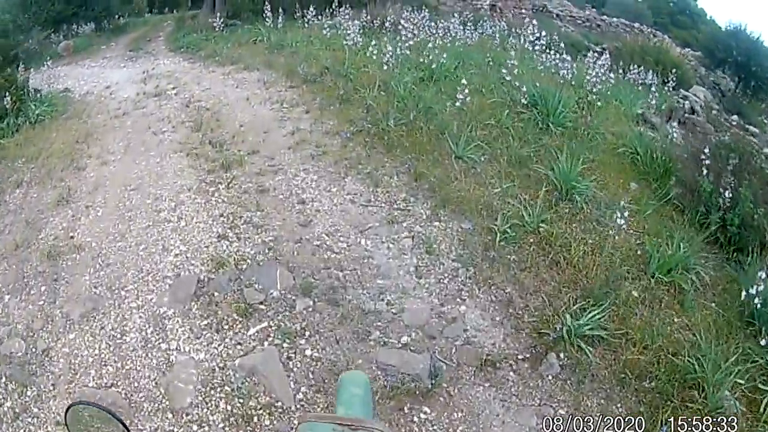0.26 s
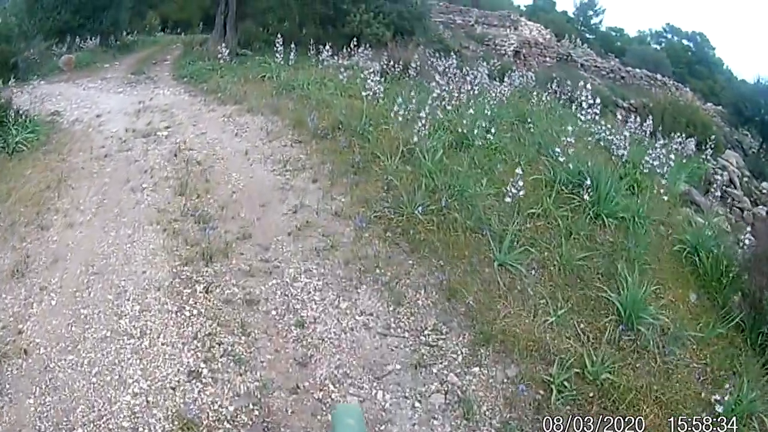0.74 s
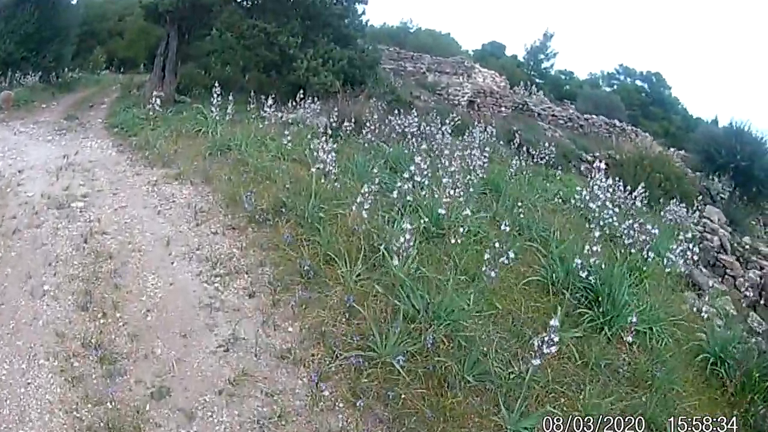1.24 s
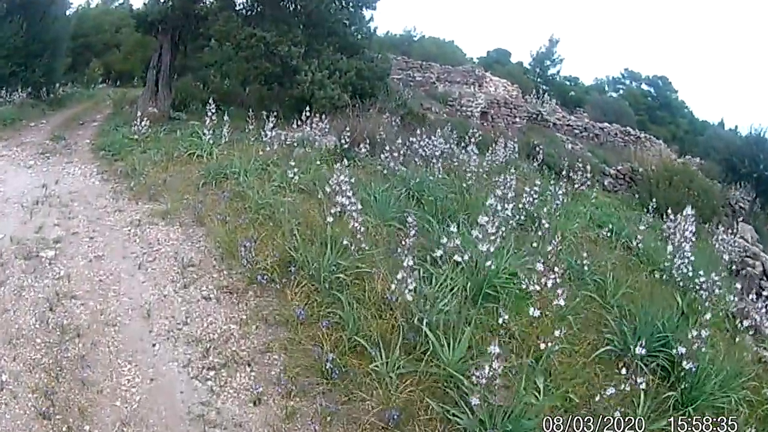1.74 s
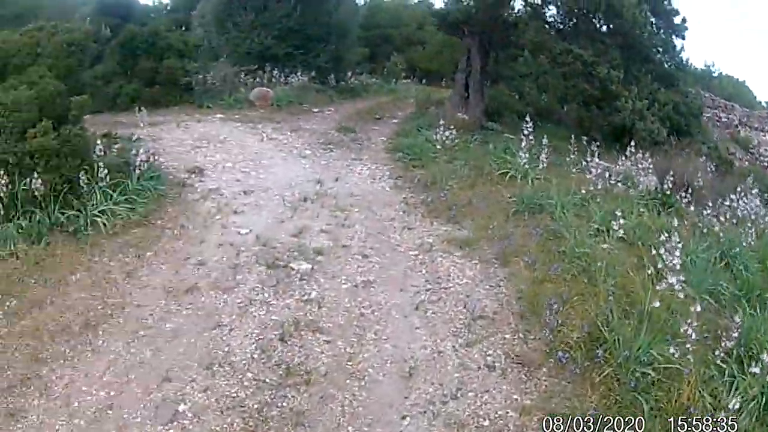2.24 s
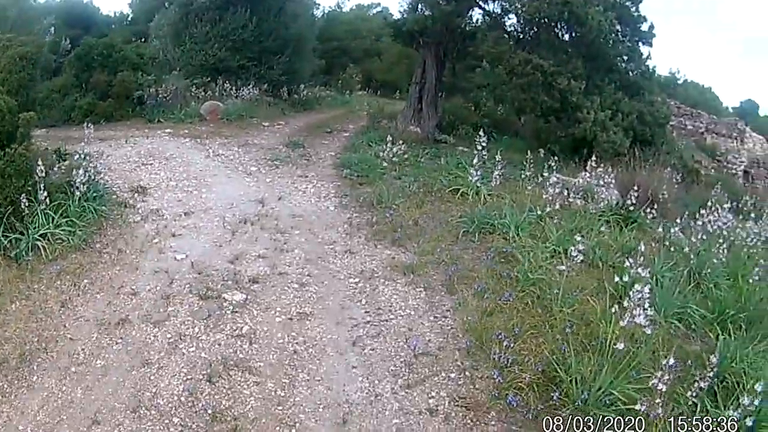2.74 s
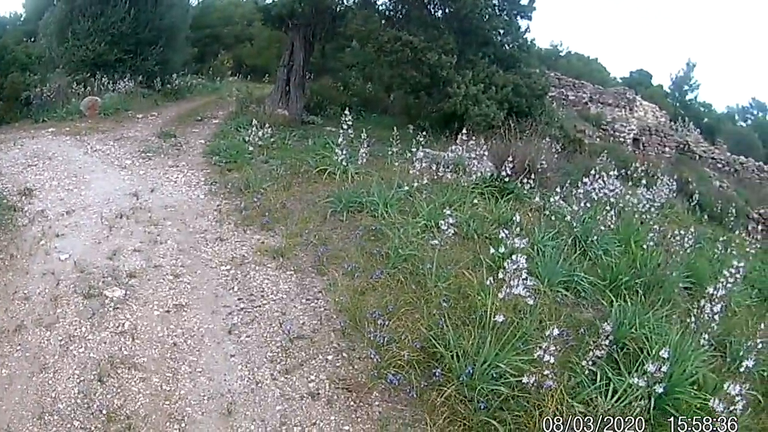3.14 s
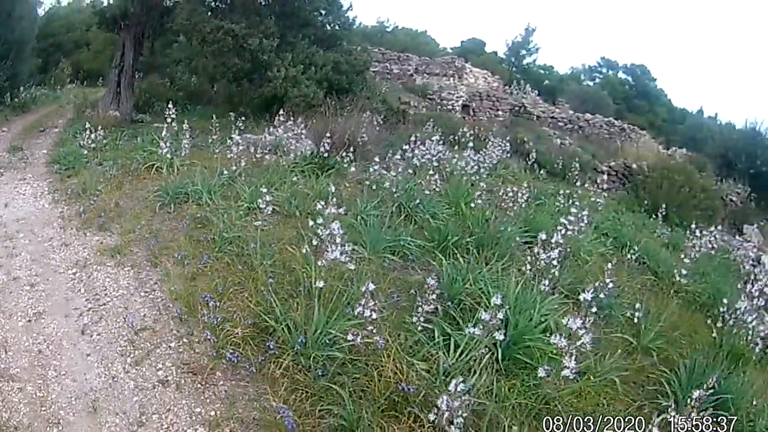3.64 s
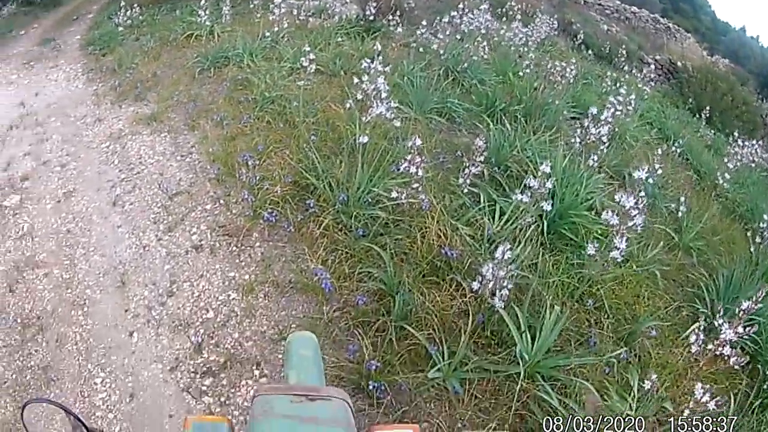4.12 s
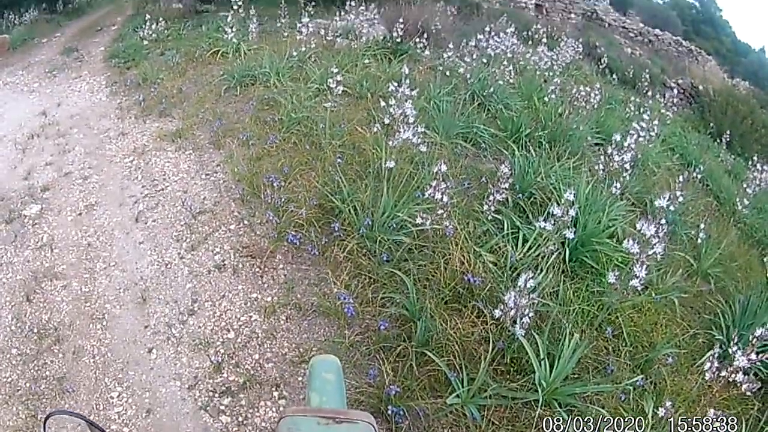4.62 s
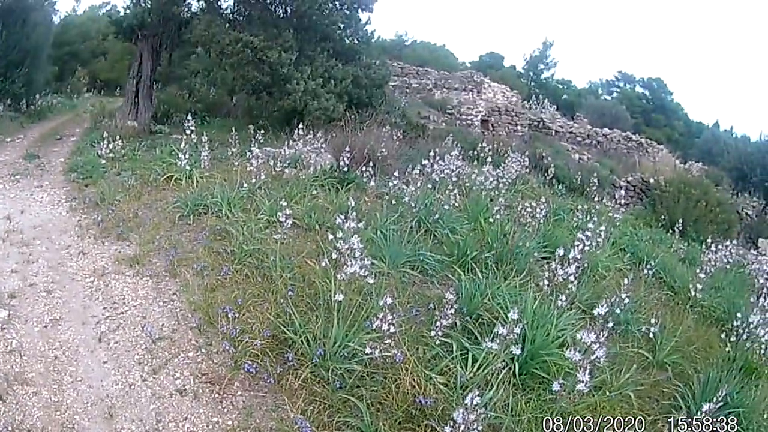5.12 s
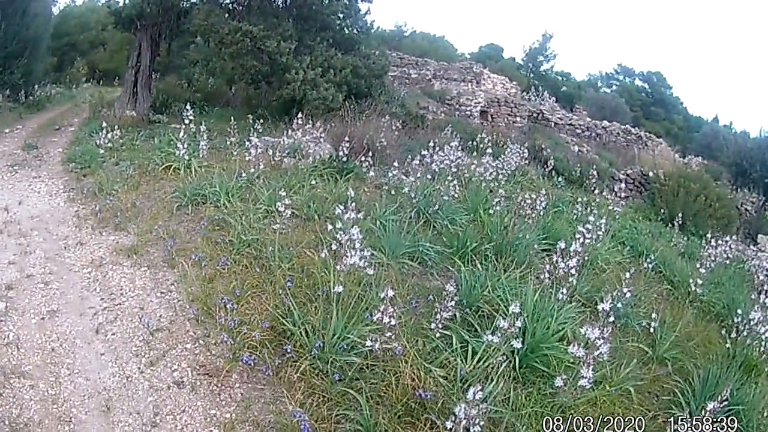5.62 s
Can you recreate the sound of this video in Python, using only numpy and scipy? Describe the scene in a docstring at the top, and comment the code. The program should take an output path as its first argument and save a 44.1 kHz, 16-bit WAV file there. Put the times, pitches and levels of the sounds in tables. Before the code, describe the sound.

A small single-cylinder motorcycle engine heard from the rider's head outdoors. It starts fast on a closed throttle, swells into a brief throaty rev, then falls away with loose metal chinking. By about two seconds it settles to a low, steady putter of separate thumps, with tappet ticks, soft knocks, a mechanical whirr and occasional weak beats.

```python
"""A small single-cylinder engine thumps through a blip of throttle and an overrun, then settles to idle, heard
at the rider's helmet. Each exhaust opening pushes or sucks at the resonant pipe, with an intake gulp beside it
and a second thump behind. Knocks and valve gear sound at set crank angles over the whirr of the cases, which is
noise shaped by their spectrum; a loose metal part chinks as noise bursts passed through its modes."""
import sys
import numpy as np
from scipy import signal
from scipy.fft import rfft, irfft, next_fast_len
from scipy.io import wavfile
from scipy.ndimage import uniform_filter1d

SR = 44100
rng = np.random.default_rng(int(sys.argv[2]) if len(sys.argv) > 2 else 0)


def generate_wav(sig):
    """Save sig (samples, or channels by samples) to the path in sys.argv[1] as 16-bit PCM at SR."""
    pcm = np.round(np.clip(np.atleast_2d(sig).T, -1, 1) * 32767).astype(np.int16)
    wavfile.write(sys.argv[1], SR, pcm)


N = 258867
T = np.arange(N) / SR  # s
IDLE_REVS = 15.4  # engine cycles per s

# cylinder pressure at exhaust opening, above 0 burnt gas pushes, below 0 vacuum sucks: start_s, pressure [relative]
LOAD = [(0, -0.42), (.05, -0.3), (.085, -.11), (.12, .2), (.16, 0.31), (.4, 0.43), (.55, 0.46), (.86, 0.44),
        (.895, 0.25), (.92, -0.36), (1.44, -0.23), (1.48, 0.12), (2.15, 0.094), (5.87, .09)]
# cycles that burn unlike their neighbours: start_s, pressure [relative]
ODD_CYCLES = [(1.23, -0.13), (1.383, 0.14), (1.655, -0.1), (2.008, -0.15), (3.411, -0.19), (4.06, -0.03),
              (4.516, 0.15), (4.582, -0.21), (5.11, -0.19)]


def undb(db):
    """The decibel law for amplitudes: 20 dB is a factor of ten."""
    return 10 ** (np.asarray(db) / 20)


def curves(table, s):
    """Linear interpolation of a table's columns at times s."""
    rows = np.array(table, float)
    return [np.interp(s, rows[:, 0], column) for column in rows.T[1:]]


def add(track, s, sound):
    """Superposition: mix a sound in at time s."""
    i = int(s * SR)
    if 0 <= i < N:
        track[i:i + len(sound)] += sound[:N - i]


def unit(x):
    """Power normalisation: scale to rms 1."""
    return x / np.sqrt(np.mean(x ** 2))


def walk(rate):
    """Low-passed noise: random levels held 1 / rate s, then averaged twice over that time."""
    hold = int(SR / rate)
    levels = np.repeat(rng.standard_normal(N // hold + 1), hold)
    return uniform_filter1d(uniform_filter1d(levels, hold), hold)[:N]


def revs():
    """Crank speed in engine cycles per s: the rider's hand, less the torque lost at each idle misfire."""
    # engine speed: start_s, speed_cycles_per_s
    speed_curve = [(0, 26.347), (.12, 24.142), (.25, 24.721), (.55, 28.578), (.85, 29.496), (.95, 25.863),
                   (1.1, 22.355), (1.3, 19.619), (1.75, 17.042), (2.1, 16.288), (2.4, 15.948),
                   (2.55, 15.277), (2.8, 15.607), (4.5, 15.354), (5.2, 15.242), (5.87, 15.944)]
    settled_s = 2.5  # from here the idle is steady
    sag_revs, sag_late_s, sag_s = .41, .04, .1  # depth in cycles per s, delay, width
    misfires = [s for s, pressure in ODD_CYCLES if s > settled_s and pressure < -.1]
    sag = sum(sag_revs * np.exp(-((T - s - sag_late_s) / sag_s) ** 2) for s in misfires)
    return curves(speed_curve, T)[0] - sag


def openings():
    """The four-stroke cycle: integrated speed gives one exhaust opening every two crank turns, in s."""
    start_cycle = -.066
    cycle = start_cycle + np.cumsum(revs()) / SR
    return np.interp(np.arange(int(cycle[-1]) + 1), cycle, T)


def ring(hz, steep):
    """Coupled resonance: pipe and silencer are tuned alike, so modes swell, then fade; cold gas rings longer."""
    # pipe and silencer; the gain is per unit of pressure, as the wave steepens:
    # multiple [of the pipe note], decay_s [at zero pressure], level_db, gain_db
    pipe = [(0.999, 0.0035, 2, -1), (2.1, 0.0054, -22.5, 18.5), (2.85, .004, -22, 19),
            (3.8, .005, -30.5, 19.5), (4.701, 0.0044, -32.5, 24)]
    seconds = T[:SR // 14]
    t = seconds * (1 + .5 * steep)
    phase = 2 * np.pi * hz * seconds
    out = 0
    for multiple, decay, db, gain_db in pipe:
        envelope = (.25 + t / decay) * np.exp(1 - t / decay)
        out = out + undb(db + gain_db * steep) * envelope * np.sin(multiple * phase)
    return out


def exhaust(times):
    """Pulse excitation of a resonator: pushes or sucks at the pipe, intake gulps and second thumps."""
    # the pipe note rises with hot gas: Hz, Hz per unit of pressure, Hz per cycle per s above idle
    pipe_hz, heat_hz, speed_hz = 112.8, 31.8, 0.72
    gulp_per_rev = 0.0159  # the intake gulp grows with speed above idle
    second_db, second_db_per_rev = -20, -1.5  # the second thump at idle; it fades as speed rises

    speeds = 1 / np.gradient(times) - IDLE_REVS
    chance = rng.standard_normal((len(times), 3))
    pressures = curves(LOAD, times)[0] + 0.016 * chance[:, 0]
    for s, odd in ODD_CYCLES:
        pressures[np.argmin(abs(times - s))] = odd

    out, t = np.zeros(N), np.arange(-.004, .004, 1 / SR)
    # a dip, a snap, an overshoot
    gulp = np.tanh(t / .00027) * np.exp(np.where(t < 0, -(t / .0012) ** 2, -2.6 - (t / .0025) ** 2))
    for s, speed, pressure, (_, note_chance, second_chance) in zip(times, speeds, pressures, chance):
        push = max(pressure, 0)
        # cold air drawn by a vacuum is slow, a hot blast is fast
        late = 0.004 * max(-pressure, 0) - 0.0014 * push
        note_hz = pipe_hz + heat_hz * pressure + speed_hz * speed + 1.6 * note_chance
        add(out, s + late, (.95 - 0.32 * push) * pressure * ring(note_hz, pressure))
        gulp_gain = gulp_per_rev * max(speed, 0) + 1.3 * max(pressure - .03, 0)
        add(out, s + t[0] + 1.25 * min(late, 0), gulp_gain * gulp)
        # the snap returns from the pipe's end
        add(out, s + t[0] + late + .0078, 0.098 * push * gulp)
        thump_db = second_db + second_db_per_rev * speed + 0.29 * second_chance
        add(out, s + 0.01677, -undb(thump_db) * ring(105.0, 0.11))
    # the silencer swallows the treble of every edge
    return signal.sosfilt(signal.butter(4, 880, fs=SR, output="sos"), out)


def knocks(times):
    """Impact excitation: valves seat and the piston rocks over, ringing damped modes of the cases."""
    # clean knocks that repeat each cycle: share [of the cycle], pitch_hz, decay_s, level_db [peak over whirr rms]
    knock_modes = [(.21, 2383, 0.0026, -22.5), (0.259, 2095, 0.0043, -26.5), (0.553, 385.2, 0.0089, -8),
                   (0.62, 483.5, 0.012, -7)]
    out, t = np.zeros(N), T[:SR // 10]
    for s, length in zip(times, np.gradient(times)):
        for share, hz, decay, db in knock_modes:
            level_chance, time_chance = rng.standard_normal(2)
            tone = t / decay * np.exp(1 - t / decay) * np.sin(2 * np.pi * hz * t)
            add(out, s + length * share + 0.00033 * time_chance, undb(db + level_chance) * tone)
    return out


def valve_gear(times, band_hz):
    """Cyclic amplitude modulation: one band's gain flares near set crank angles, never quite alike."""
    # bursts: share [of the cycle], pitch_hz, width_hz [to 1/e], decay_s, level_db [gain added at the pitch]
    ticks = [(0.179, 3530, 1230, 0.0023, 4.5), (.21, 2426, 509, 0.0056, 3), (0.328, 1576, 489, 0.0054, 2),
             (0.548, 5660, 880, 0.0027, 0.5), (0.678, 479.5, 89.5, 0.0052, -10.5),
             (0.783, 1734, 495, 0.0071, 4.5), (0.788, 3484, 1210, 0.0041, 1.5),
             (0.862, 953, 509, 0.005, -17.5)]
    out, t = np.ones(N), T[:SR // 20]
    for share, hz, width, decay, db in ticks:
        near = np.exp(-((band_hz - hz) / width) ** 2)
        if near > .05:
            burst = near * t / decay * np.exp(1 - t / decay)
            chance = rng.standard_normal((len(times), 2))
            for s, length, (level_chance, time_chance) in zip(times, np.gradient(times), chance):
                add(out, s + length * (share + 0.012 * time_chance), undb(db + 0.57 * level_chance) * burst)
    return out


def whirr(times, treble_db, calm_db):
    """Filtered noise: bands of the cases' spectrum each flicker alone, and the low ones repeat every cycle."""
    # broad spectrum of the cases: pitch_hz, density_db [relative, per Hz]
    cases = np.array([(60, -27), (120, 3.5), (240, -13), (310, -14.5), (480, -11), (590, -12), (690, -12),
                      (830, -19.5), (1650, -33), (1900, -41), (2400, -46), (2850, -58), (3400, -52.5),
                      (4050, -54), (4900, -66), (5750, -64), (6600, -69.5), (8000, -79.5)])
    # resonances of the cases: pitch_hz, width_hz, level_db [over the broad spectrum]
    case_modes = [(377, 83, 5.5), (489.6, 33, 8.5), (1593, 19, 3), (2072, 47, 7), (2330, 25, -0.5)]
    # the middle band around 1180 Hz sinks and swells: start_s, level_db
    mid_lift = [(0, 2.5), (1.9, -0.5), (2.8, -4), (3.5, -1.5), (4.2, 5.5), (5.0, -0.5), (5.87, 0.5)]

    size = next_fast_len(N)
    f = np.maximum(np.fft.rfftfreq(size, 1 / SR), 1)
    fast = np.clip(revs() - IDLE_REVS, 0, 6.0)
    mid_db = curves(mid_lift, T)[0]
    shape = undb(np.interp(np.log(f), np.log(cases[:, 0]), cases[:, 1]))
    shape = shape * undb(sum(db / (1 + (2 * (f - hz) / width) ** 2) for hz, width, db in case_modes))
    last = np.maximum(np.searchsorted(times, T) - 1, 0)
    since = np.abs((T - times[last]) * SR).astype(int)  # samples since the valve opened

    out = 0
    for hz in 60 * 2 ** np.arange(0, 7.4, 1 / 4):
        window = np.cos(np.pi / 2 * np.clip(4 * np.log2(f / hz), -1, 1))
        same = np.clip(.6 - hz / 2500, 0, 1)  # share of power that comes back alike every cycle
        repeated = np.sqrt(same) * rng.standard_normal(N)[since]
        noise = repeated + np.sqrt(1 - same) * rng.standard_normal(N)
        band = irfft(rfft(noise, size) * shape * window, size)[:N]
        half_octaves = np.clip(np.log2(hz / 1200), 0, 1.5) / 0.5
        # above idle the cases boom around their main mode
        boom_db = (0.33 * fast + calm_db) * np.exp(-np.log2(hz / 520) ** 2 / 0.4)
        middle_db = mid_db * np.exp(-np.log2(hz / 1180) ** 2 / .12)
        flicker_db = 1.5 * walk(18) + 0.77 * walk(1.5)
        gain = undb(flicker_db + half_octaves * treble_db + boom_db + middle_db)
        out = out + band * valve_gear(times, hz) * gain
    return unit(out)


def chinks():
    """Modal filtering: decaying noise rings a loose metal part, in set chinks and a faint random patter."""
    # chinks: start_s, level_db [nominal], dull_db [dull modes over bright ones]
    jolts = [(0.5082, -51, 3), (0.7427, -47, -2), (0.8415, -63, 11), (0.9787, -50.5, 3), (1.0074, -60, 4),
             (1.045, -47.5, 0.5), (1.1444, -72, 10), (1.1912, -66, 12), (1.2077, -60, 18.5),
             (1.2263, -69, 15), (1.286, -51.5, 3), (1.3254, -58, -2), (1.5773, -59, -9), (1.6407, -57, 7.5),
             (1.6761, -65, 13), (1.9066, -56, -3), (5.7907, -58, 1)]
    # bright modes of the metal: pitch_hz, width_hz, level_db
    bright_modes = [(5750, 170, -5), (7080, 150, -9.5), (6200, 2000, -13), (10400, 900, -15.5)]
    # dull modes of the metal: pitch_hz, width_hz, level_db
    dull_modes = [(4010, 260, 0), (3860, 300, 0), (3230, 540, 1), (2250, 590, 6.5), (4580, 810, -9)]

    out, t = np.zeros(N), T[:SR // 12]
    patter_s, patter_extra_db = rng.uniform(0, N / SR, size=70), rng.exponential(size=70)
    patter = [(s, -76 + extra_db, 3) for s, extra_db in zip(patter_s, patter_extra_db)]
    for s, db, dull_db in list(jolts) + patter:
        # the level jumps every 100 samples
        jumps = np.repeat(rng.standard_normal(len(t) // 100 + 1), 100)[:len(t)]
        chatter = rng.standard_normal(len(t)) * np.exp(-t / 0.01) * undb(3.9 * jumps)
        chatter = .2 * unit(chatter)
        for modes, part_db in ((bright_modes, db), (dull_modes, db + dull_db)):
            for hz, width, mode_db in modes:
                # a narrow mode takes less of the noise
                gain = undb(part_db + mode_db) * np.sqrt(SR / width) / 2.75
                peak = signal.iirpeak(hz, hz / width, SR)
                add(out, s, gain * signal.lfilter(*peak, signal.lfilter(*peak, chatter)))
    return signal.sosfilt(signal.butter(3, [1800, 12000], "band", fs=SR, output="sos"), out)


def scene():
    """Superposition of exhaust, mechanics and chinks; load and speed set the mechanics' level and tone."""
    whirr_db, whirr_db_per_load = -34.5, 14.5  # unloaded; per unit of pressure either way
    # dB per half octave above 1200 Hz, at idle and per cycle per s above it
    idle_treble_db, treble_db_per_rev = 0.59, 0.09
    boom_db_per_load = -6.5  # burning gas steadies the cases

    times = openings()
    pressure = curves(LOAD, T)[0]
    level_db = whirr_db + whirr_db_per_load * uniform_filter1d(np.abs(pressure), size=SR // 8)
    treble_db = idle_treble_db + treble_db_per_rev * (revs() - IDLE_REVS)
    calm_db = boom_db_per_load * np.maximum(pressure, 0)
    mechanics = whirr(times, treble_db, calm_db) + undb(calm_db) * knocks(times)
    return (exhaust(times) + undb(level_db) * mechanics + chinks())[None]


def record(dry):
    """Band-limiting: the microphone drops the deepest bass, adds its hiss and cuts the top."""
    hiss_db, top_hz = -79, 15700  # hiss rms before the top is cut
    hiss = undb(hiss_db) * rng.standard_normal(dry.shape)
    wet = signal.sosfilt(signal.butter(2, 65, "highpass", fs=SR, output="sos"), dry) + hiss
    return signal.sosfilt(signal.ellip(10, .2, 70, top_hz, fs=SR, output="sos"), wet)


dry = scene()
out = record(dry)
generate_wav(out)
```